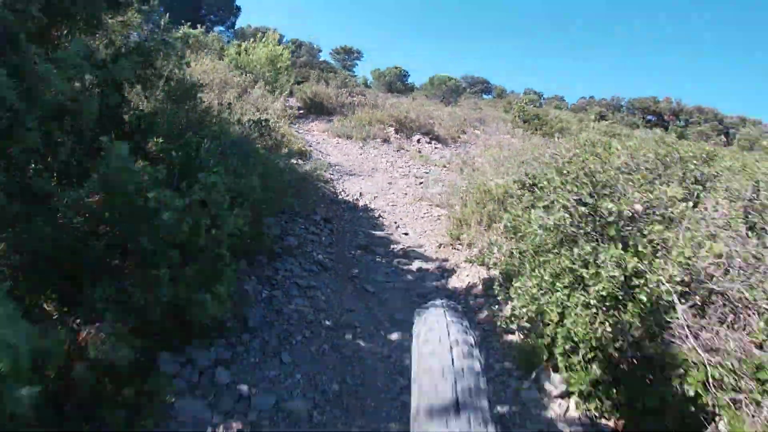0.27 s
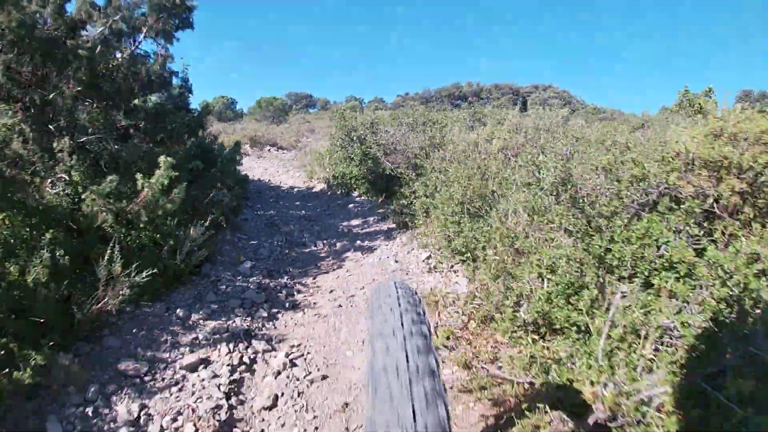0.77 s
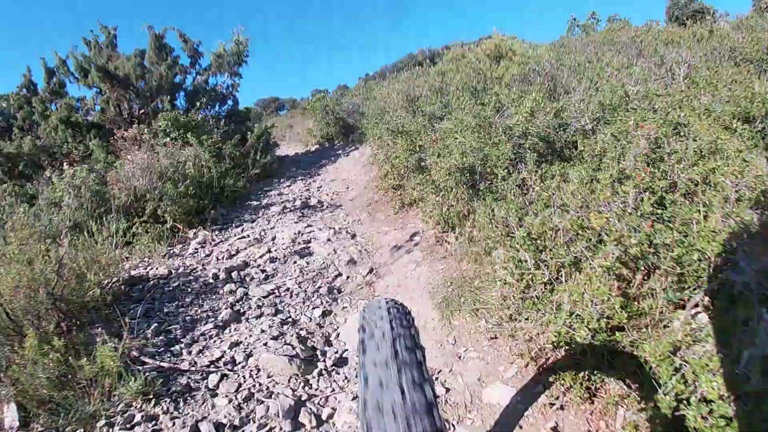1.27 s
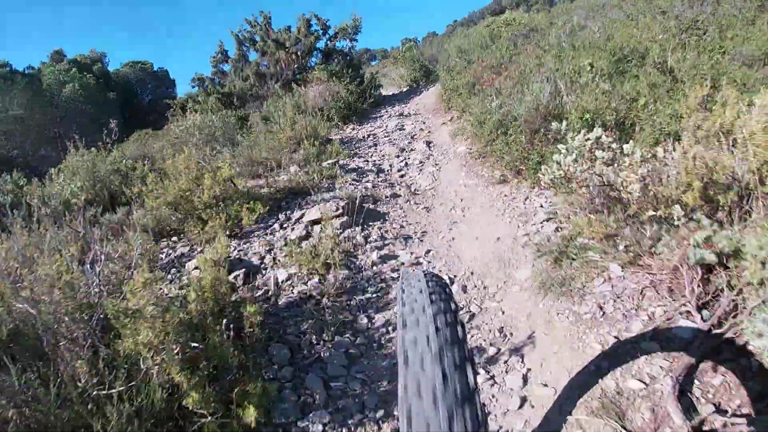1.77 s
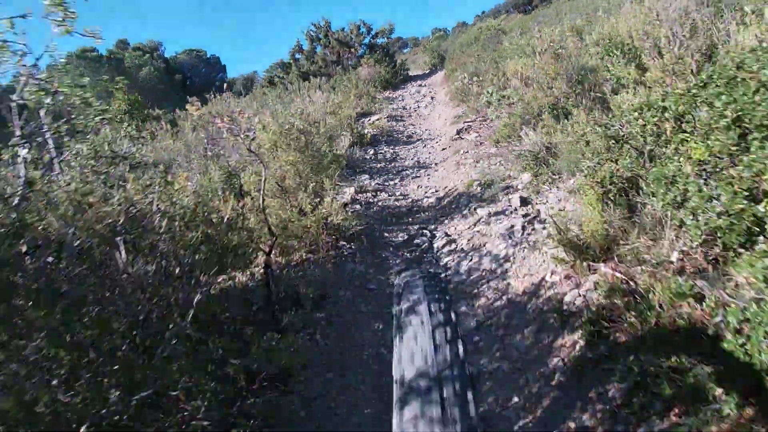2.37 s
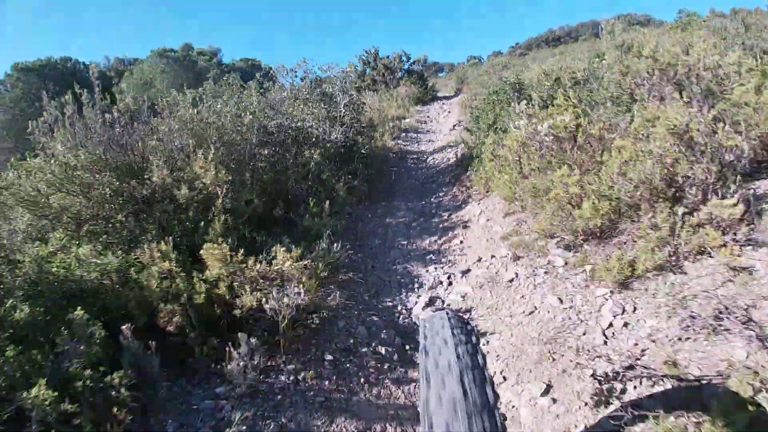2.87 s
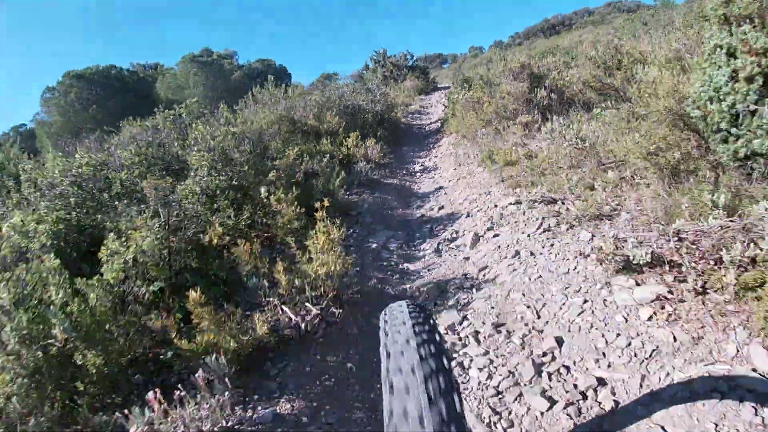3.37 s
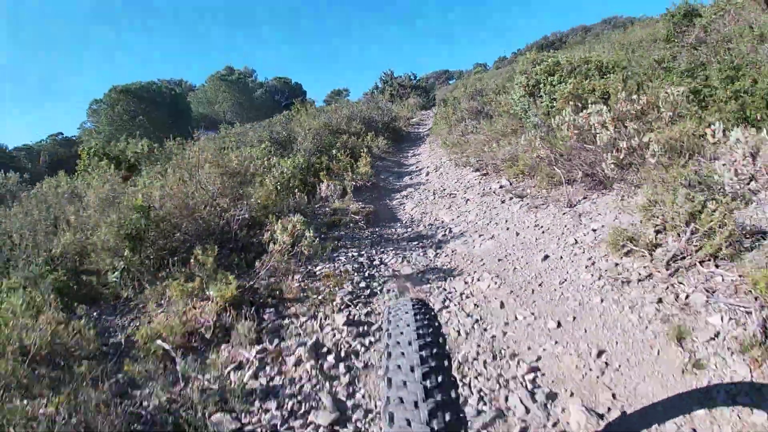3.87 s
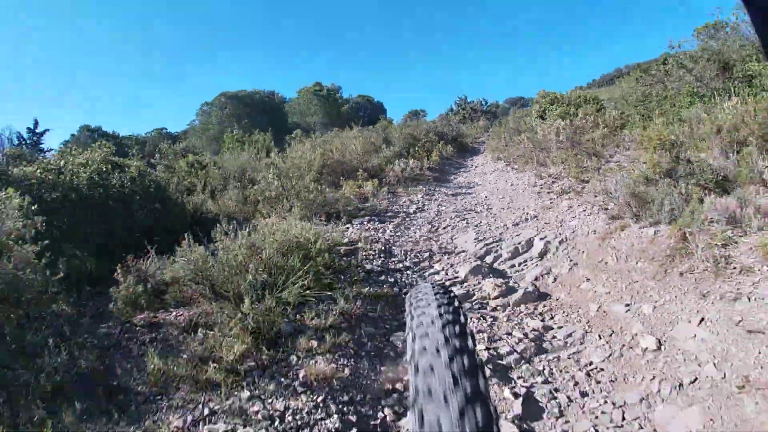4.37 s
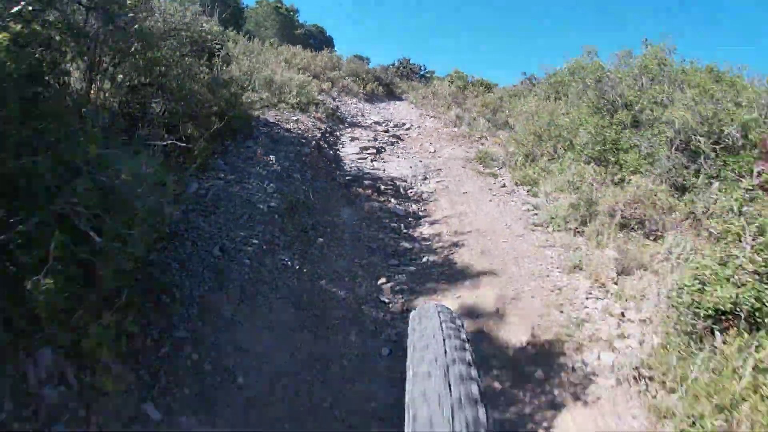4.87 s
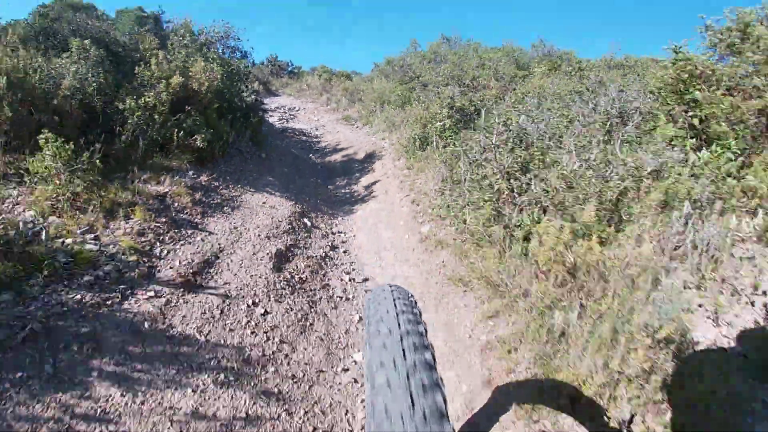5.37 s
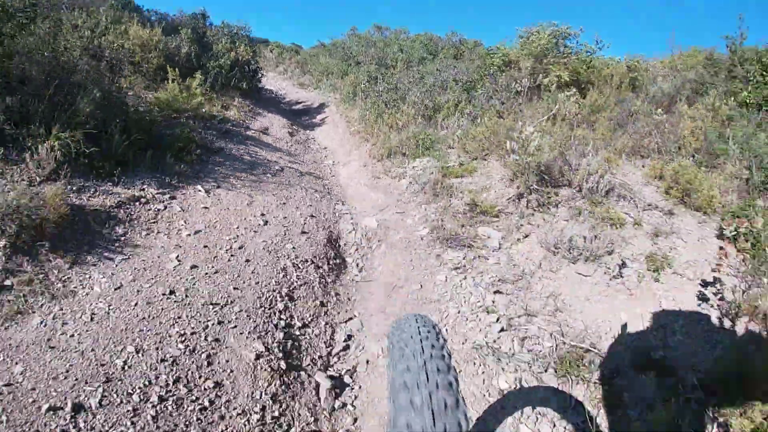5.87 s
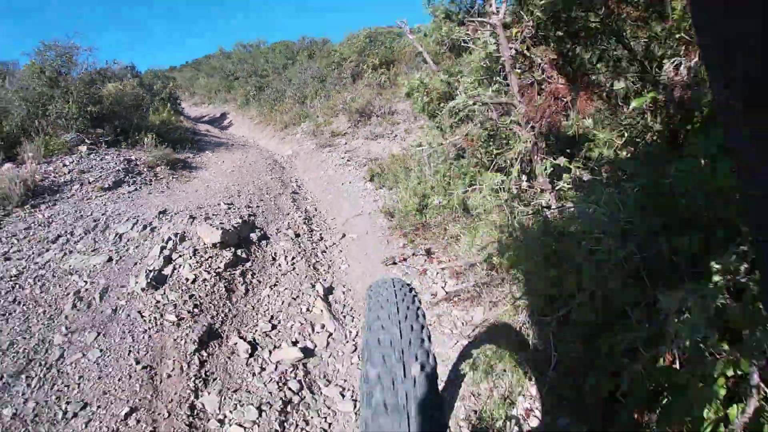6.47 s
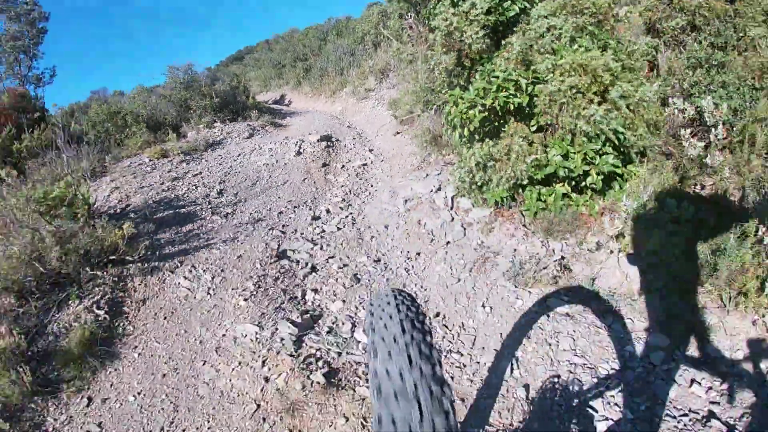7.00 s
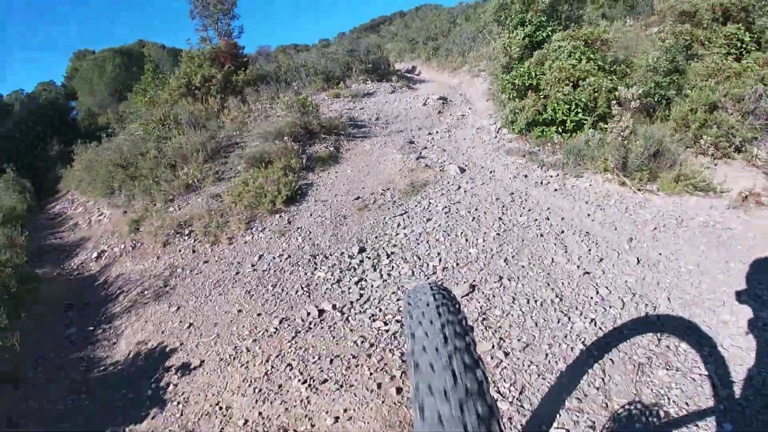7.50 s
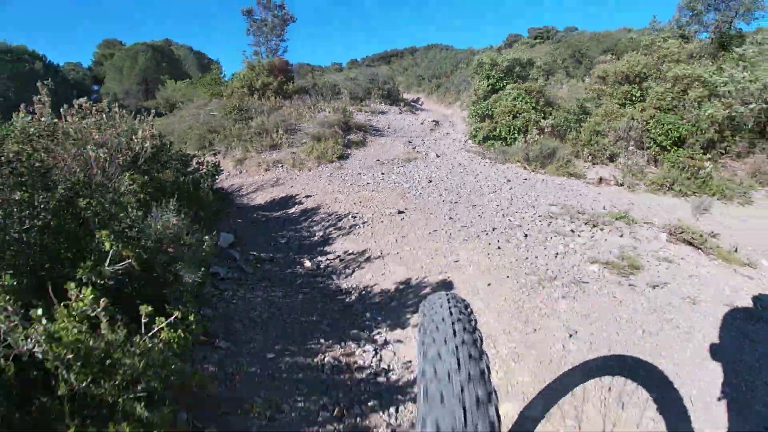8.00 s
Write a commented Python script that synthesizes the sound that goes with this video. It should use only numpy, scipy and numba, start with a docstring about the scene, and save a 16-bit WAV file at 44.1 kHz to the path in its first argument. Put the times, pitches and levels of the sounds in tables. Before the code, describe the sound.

On a rocky hillside trail, a mountain bike rolls over loose gravel. Low wind buffets and pops at a small enclosed microphone worn by the rider, while tyres crunch grit, the frame shakes, and plastic knocks and bright stone ticks come irregularly. The knocks are sparse at first, then frequent from just after one second. Treble is dulled, close and without echo.

```python
"""On a stony trail a mountain bike climbs, heard by a small camera in a closed housing on the rider.
Wind buffets the microphone port: band-passed noise whose centre moves with the stream, with sharp pops.
Random cracks crush gravel and excite the resonances of the frame; shaped noise bursts make the knocks of
the mount and the ticks of thrown stones; a narrow band of noise hums in the tyre.
The housing dulls the treble and a limiter holds the peaks."""
import sys
import numpy as np
from scipy import signal
from scipy.fft import rfft, irfft
from scipy.io import wavfile
from scipy.ndimage import uniform_filter1d, minimum_filter1d
from numba import njit

SR = 44100
rng = np.random.default_rng(int(sys.argv[2]) if len(sys.argv) > 2 else 0)


def digitize_waveform(pressure):
    """Quantize a signal to 16-bit integers and store it at the path in sys.argv[1].

    Rows of a 2-D input are taken as channels; values are limited to [-1, 1].
    """
    field = np.atleast_2d(pressure).T
    bounded = np.clip(field, -1, 1)
    quanta = np.round(bounded * 32767).astype(np.int16)
    wavfile.write(sys.argv[1], SR, quanta)


N = 363384

# pressure pops when an eddy breaks on the port: start_s, level_db
EDDY_POPS = [(0.436, -18.5), (0.777, -21), (0.806, -18), (1.216, -18), (1.483, -18.5), (1.5, -22),
             (1.792, -22.5), (1.861, -15.5), (2.454, -15.5), (2.479, -16), (2.519, -17.5), (2.875, -17.5),
             (3.272, -23), (3.291, -15.5), (3.336, -23), (3.458, -17), (3.895, -18), (3.92, -15.5),
             (3.932, -26.5), (4.558, -13), (4.574, -14.5), (4.597, -23.5), (5.322, -14), (5.346, -14.5),
             (5.796, -14.5), (5.812, -13.5), (7.994, -22)]
# broad transmission of air-borne sound through the housing: frequency_hz, gain_db
HOUSING_CURVE = [(600, 5.5), (1200, 4.5), (2500, -4), (4300, -12.5), (6200, -14), (7000, -29.5),
                 (8000, -47.5), (10000, -61.5), (12000, -69), (15000, -75.5)]
# cavity resonances of the housing: centre_hz, width_hz, lift_db
CAVITY_MODES = [(1725, 89, 6.7), (5370, 530, 8.7), (9400, 300, 6), (10500, 260, 11)]
STRIKE = 0.3  # first contact of a knock or tick, relative to the rattle that follows


def undb(db):
    """The decibel law for amplitude: 20 dB is a factor of ten."""
    return 10 ** (np.asarray(db) / 20)


def unit(x):
    """Normalisation by effective value: scale to rms 1."""
    return x / np.sqrt(np.mean(x ** 2))


def columns(table):
    """Linear interpolation: every column after the time, at every sample."""
    s, *rest = np.transpose(table)
    return [np.interp(np.arange(N) / SR, s, c) for c in rest]


@njit
def svf(x, hz, width):
    """A driven, damped resonator: band-pass whose centre may move, with gain 1 at the centre."""
    y, b, l = np.empty(len(x)), 0., 0.  # b and l: states of the two integrators
    for i in range(len(x)):
        g, k = np.tan(np.pi * hz[i] / SR), width / hz[i]
        v = (b + g * (x[i] - l)) / (1 + g * (g + k))
        b, l, y[i] = 2 * v - b, l + 2 * g * v, k * v
    return y


def band(x, hz, width):
    """A resonator of constant pitch: fixed band-pass."""
    return svf(x, np.full(len(x), 1. * hz), 1. * width)


def butterworth(x, order, edge_hz, kind="low"):
    """Maximally flat filtering: the pass band has no ripple."""
    return signal.sosfilt(signal.butter(order, edge_hz, kind, fs=SR, output="sos"), x)


def colour(x, points, peaks=()):
    """Minimum phase: a folded cepstrum makes a causal filter from a gain curve and its resonances."""
    size = 4096
    f = np.maximum(np.fft.rfftfreq(size, 1 / SR), 1)
    hz, db = np.transpose(points)
    db = np.interp(np.log(f), np.log(hz), np.maximum(db, -90))
    for centre_hz, width_hz, lift_db in peaks:
        db = db + lift_db / (1 + (2 * (f - centre_hz) / width_hz) ** 2)
    cepstrum = irfft(np.log(undb(db)))
    cepstrum[1:size // 2] *= 2
    cepstrum[size // 2 + 1:] = 0
    response = irfft(np.exp(rfft(cepstrum)))
    return signal.fftconvolve(x, response)[:len(x)]


def walk(rate):
    """Slow random modulation: levels held 1 / rate s, smoothed twice, with rms 1."""
    hold = int(SR / rate)
    steps = np.repeat(rng.standard_normal(N // hold + 1), hold)
    return unit(uniform_filter1d(uniform_filter1d(steps, hold), hold)[:N])


def grains(rate, spread_db, top_db, smear_s):
    """Shot noise: random cracks of unequal, capped size, each a short decaying burst of noise."""
    size_db = np.minimum(spread_db * rng.exponential(size=N), top_db)
    hits = (rng.random(N) < rate / SR) * undb(size_db)
    softened = uniform_filter1d(hits ** 2, size=int(smear_s * SR / 2))
    power = signal.lfilter([1], [1, -np.exp(-1 / (smear_s * SR))], softened)
    return unit(np.sqrt(np.abs(power)) * rng.standard_normal(N))


def bursts(rows, shape, rise_s, fall, strike=0.):
    """Impact excitation: each (start_s, level_db, length_s, ..) row is a noise burst through a filter."""
    size = 8192
    out = np.zeros(N + size)
    t = np.arange(size) / SR
    for (s, level_db, length_s, *rest), noise in zip(rows, rng.standard_normal((len(rows), size))):
        swell = (1 - np.exp(-t / rise_s)) * np.exp(-(t / max(length_s, 1e-4)) ** fall)
        energy = np.sum(swell ** 2)
        contact = strike * np.sqrt(energy) * (t == 0)
        one = shape(noise * swell + contact, *rest)
        # the burst gets the energy of a tone with this envelope
        match = np.sqrt(energy / np.sum(one ** 2) / 2)
        out[int(s * SR):int(s * SR) + size] += undb(level_db) * one * match
    return out[:N]


def throat(x):
    """Cavity resonance: the port lifts a band of air-borne sound, moving as the housing tilts."""
    # resonance of the port: start_s, centre_hz
    throat_path = [(0, 3510), (3.85, 3500), (4.15, 2960), (4.6, 3000), (5.0, 3460), (8.24, 3430)]
    width_hz, lift_db = 330., 7.5
    return x + undb(lift_db) * svf(x, columns(throat_path)[0], width_hz)


def wind():
    """Turbulence: eddies throb in the port over a deep rumble, and smaller ones flutter above the throb."""
    # air stream over the port: start_s, throb_level_db, throb_centre_hz, rumble_level_db
    stream = [(0, -27, 91, -21), (.3, -22, 85, -18.5), (.58, -16.5, 86.4, -32.5), (.8, -18, 66.6, -17),
              (1.05, -20.5, 108.8, -24), (1.35, -22.5, 72.3, -21), (1.7, -22, 79.4, -19),
              (1.9, -17.5, 109.3, -20.5), (2.12, -18.5, 113, -29), (2.33, -28, 72, -18.5),
              (2.58, -16, 113, -30), (2.85, -19.5, 90.4, -21.5), (3.28, -19.5, 105.3, -20.5),
              (3.5, -15, 80, -24.5), (3.9, -19.5, 81.8, -22), (4.2, -22, 91.8, -26.5),
              (4.75, -23, 82.4, -23), (5.25, -16.5, 82.4, -23.5), (5.6, -21, 78.8, -19),
              (6.1, -28.5, 72, -28), (6.7, -42, 62.5, -20), (7.15, -17, 61.9, -18.5), (7.6, -20, 67, -22),
              (8.24, -25.5, 63.7, -19.5)]
    throb_db, hz, rumble_db = columns(stream)

    # a breaking eddy lifts the throb around its pop
    surge_db, surge_s = -3.5, 0.025  # level over the pop, time scale of the bell
    s, pop_db = np.transpose(EDDY_POPS)
    pops = np.bincount((s * SR).astype(int), undb(2 * (pop_db + surge_db)), N)
    bell = np.exp(-(np.arange(-SR // 4, SR // 4) / SR / surge_s) ** 2)
    surge_power = np.abs(signal.fftconvolve(pops, bell, "same"))
    power = undb(2 * throb_db) + surge_power
    surge_share = surge_power / power

    # surges and small gusts move the centre by these shares
    surge_rise, wander = 0.4, 0.045
    gusts = walk(5)
    hz = hz * (1 + surge_rise * surge_share) * np.exp(wander * gusts)
    throb = svf(svf(svf(rng.standard_normal(N), hz, 41.8), hz, 81.0), hz, 120.0)
    throb = unit(throb * undb(0.74 * walk(8) + 1.8 * gusts))

    rumble = band(band(rng.standard_normal(N), 36, 47), 42, 45)
    rumble = unit(rumble * undb(1.34 * walk(6.0)))

    flutter = unit(svf(svf(grains(150, 6.1, 19.5, 0.0049), 2.456 * hz, 67.0), 1.63 * hz, 240.0))
    flutter = undb(-19.5 + 2.5 * gusts + 9.5 * surge_share) * flutter

    # quicker eddies just above the throb, stronger as the stream speeds up
    at_100_hz_db, db_per_octave = -12.5, 7
    quick = unit(svf(svf(rng.standard_normal(N), 1.376 * hz, 60.0), 1.393 * hz, 60.0))
    quick = undb(at_100_hz_db + db_per_octave * np.log2(hz / 100)) * quick
    return np.sqrt(power) * (throb + quick + flutter) + undb(rumble_db) * rumble + slaps()


def slaps():
    """Pressure transients: each pop is one quick swing that thumps and shakes the port for a moment."""
    swing_db, shake_db, thump_db = 6.5, -8, -4.5  # over the level of the pop
    out = np.zeros(N)
    for (s, level_db), (quick, turn) in zip(EDDY_POPS, rng.random((len(EDDY_POPS), 2))):
        hz = 190 * (1 + 0.66 * quick)
        cycles = np.arange(int(2 * SR / hz)) * hz / SR - 1
        swing = np.exp(-np.abs(cycles / 0.26) ** 2.0) * np.cos(2 * np.pi * (cycles + turn))
        out[int(s * SR):int(s * SR) + len(cycles)] += undb(level_db + swing_db) * swing
    thumps = [(s, db + thump_db, .014) for s, db in EDDY_POPS]
    shakes = [(s, db + shake_db, .012) for s, db in EDDY_POPS]
    out += bursts(thumps, lambda x: band(band(x, 230, 120), 200, 260), rise_s=0.0018, fall=0.81)
    return out + bursts(shakes, lambda x: band(band(x, 550, 890), 700, 1100), rise_s=0.0041, fall=1.0)


def ground():
    """Superposition: frame shake, pebbles and gravel add up, swelling with one load on the tyre."""
    # ground under the tyres: start_s, coarse_stones_db, fine_gravel_db
    surface = [(0.0, -34.5, -33), (0.96, -43.5, -42), (1.4, -35.5, -35), (1.97, -38, -39.5),
               (2.8, -36.5, -36), (3.28, -38, -35.5), (3.63, -40, -37), (4.18, -33.5, -34),
               (4.5, -36.5, -38), (4.75, -33, -31.5), (5.05, -42.5, -38.5), (5.65, -38.5, -35),
               (6.35, -40.5, -37), (6.72, -34, -34.5), (7.32, -34.5, -35.5), (7.44, -32.5, -35.5),
               (7.6, -40.5, -42.5), (7.87, -45.5, -42.5), (8.24, -42, -35)]
    coarse_db, fine_db = columns(surface)
    load = np.tanh(3.8 * walk(15) + 0.66 * walk(6.8))
    pebble_db = -9.5  # relative to the frame shake
    coarse = frame_shake(load) + undb(pebble_db) * pebbles(load)
    return undb(coarse_db) * coarse + undb(fine_db) * gravel(load)


def frame_shake(load):
    """Modal excitation: jolts from stones ring the modes of frame and tyre."""
    # frame and tyre modes: centre_hz, width_hz, level_db
    frame_modes = [(464, 35, 6), (600, 46, 6.5), (729, 21.2, 7), (855.3, 19.6, 9), (1230, 67, -3)]
    drift = 0.024  # typical share by which each mode wanders
    jolts = grains(500, 5.6, 14.8, 0.0018) * undb(1.86 * load)
    shake = undb(-17.0) * band(jolts, 650, 370)
    for k, (hz, width_hz, db) in enumerate(frame_modes):
        mode = svf(jolts, hz * np.exp(drift * walk(4)), 1. * width_hz)
        shake = shake + (-1) ** k * undb(db) * mode  # neighbours in opposite phase
    return unit(shake)


def pebbles(load):
    """Resonant fracture noise: short snaps and longer grinds ring at a pitch that changes at random."""
    draws = np.repeat(rng.standard_normal(N // 512 + 1), 512)[:N]  # a new pitch every 12 ms
    pitch_hz = 1800 * undb(4.0 * draws.clip(-2, 1.3))
    snaps = grains(59, 2.0, 21, 0.0017)
    grinds = undb(12.5) * grains(32, 17.0, 8.1, 0.0061)
    cracks = (snaps + grinds) * undb(3.6 * load)
    ringing = svf(svf(cracks, pitch_hz, 620.0), pitch_hz, 1200.0)
    return unit(butterworth(ringing, 6, 5000))  # dulled by the housing wall


def gravel(load):
    """Granular friction: fine grit crackles in patches over a smooth roll, through the housing."""
    # borders between coarse, middle and fine grit: edge_hz
    grit_edges_hz = [2000, 4430]
    ranges = [(grit_edges_hz[0], "low"), (grit_edges_hz, "band"), (grit_edges_hz[1], "high")]
    # each size cracks on its own in its own range, over cracks that span them all
    sized = 0
    for edge_hz, kind in ranges:
        sized = sized + undb(2.67 * walk(25)) * butterworth(grains(110, 5.95, 13.6, 0.0024), 2, edge_hz, kind)
    crunch = undb(1.77 * load) * (sized + undb(-3.0) * grains(120, 3.5, 11.6, 0.0015))
    roll = butterworth(rng.standard_normal(N), 6, 6800)
    return unit(throat(colour(crunch + undb(-3.5) * roll, HOUSING_CURVE, CAVITY_MODES)))


def knocks():
    """Structure-borne impact: gritty blows excite the mount's modes, and the plastic dulls the treble."""
    # knocks and rattles of the mount: start_s, level_db, pitch_hz, length_ms
    blow_table = [(0.416, -33, 2620, 3.3), (0.609, -26, 2200, 3), (0.712, -20.5, 2190, 2.1),
                  (0.49, -23, 1860, 6.8), (0.8052, -18.5, 1220, 3.3), (1.0123, -21, 1480, 5.4),
                  (1.042, -29, 2100, 25), (1.2173, -9, 1570, 4.7), (1.217, -16.5, 2960, 5.8),
                  (1.243, -26.5, 2300, 36), (1.286, -17.5, 1550, 2.8), (1.343, -20.5, 1900, 14),
                  (1.468, -17.5, 1730, 9.2), (1.4935, -9, 1700, 3.2), (1.524, -9.5, 1960, 1.8),
                  (1.777, -19.5, 1800, 10), (2.105, -13, 1740, 5.1), (2.267, -22, 1810, 8.7),
                  (2.293, -19, 3040, 1.3), (2.3836, -16, 1810, 2.4), (2.501, -15.5, 1750, 3),
                  (2.874, -25, 1510, 23), (3.053, -26, 1740, 7.7), (3.214, -19.5, 1500, 7.7),
                  (3.314, -21, 1710, 19), (3.4086, -9.5, 1870, 2.8), (3.448, -21.5, 1700, 8.6),
                  (3.663, -15, 1330, 6.8), (3.664, -15.5, 2550, 4.2), (3.71, -15.5, 1750, 6.7),
                  (3.745, -22.5, 2160, 6.5), (3.779, -20, 1320, 5.1), (3.9879, -23.5, 2060, 42),
                  (3.9906, -18, 2920, 3.6), (4.002, -19, 1020, 4.7), (4.011, -14.5, 2150, 17),
                  (4.028, -20.5, 800, 38), (4.035, -21, 1720, 29), (4.056, -22, 1370, 3.8),
                  (4.281, -22.5, 1790, 35), (4.32, -20.5, 2180, 14), (4.388, -8, 2230, 2.2),
                  (4.558, -21, 900, 5.2), (4.664, -25.5, 1850, 41), (4.784, -21, 1480, 2.8),
                  (4.83, -5, 1820, 1.2), (4.863, -24, 1890, 12), (4.983, -14, 1790, 2.4),
                  (5.347, -16.5, 910, 2.7), (5.529, -23.5, 2900, 9.8), (5.5328, -10, 1370, 2.8),
                  (5.57, -21, 3500, 2.8), (5.7239, -15.5, 1510, 16.5), (5.725, -18, 3050, 12),
                  (5.812, -23, 1100, 6.2), (6.33, -22, 1610, 3.8), (6.533, -27, 1790, 31),
                  (6.591, -13, 1600, 3.4), (6.773, -8, 1560, 1.25), (6.803, -25.5, 1420, 18),
                  (6.925, -21.5, 1490, 7), (7.085, -24, 840, 30), (7.148, -20.5, 870, 10),
                  (7.29, -22.5, 890, 29), (7.5512, -4, 1680, 0.27), (8.01, -28, 1800, 4.6),
                  (8.041, -17.5, 2100, 3.5), (8.15, -12, 1650, 3.9), (8.156, -12.5, 1630, 2.6),
                  (8.21, -14.5, 1950, 4.4)]
    # modes of the plastic mount: centre_hz, width_hz, lift_db
    mount_modes = [(870, 400, 14), (1642, 46, 4.5), (1870, 350, 5.5), (3000, 520, 6)]
    # transmission of the plastic: frequency_hz, gain_db
    plastic = [(300, -35.0), (700, 4.5), (3400, 1.0), (4400, -2.5), (7000, -39.0), (12000, -81.0)]

    def body(x, hz, width_hz):
        """Each blow favours a range around its pitch before the mount colours it."""
        contacts = np.repeat(undb(2.2 * rng.standard_normal(len(x) // 64)), 64)  # 1.5 ms apart
        favoured = band(band(x * contacts, hz, 0.98 * width_hz), hz, 2.8 * width_hz)
        return colour(favoured, plastic, mount_modes)

    # a long rattle stirs more modes than a short knock
    spread_at_10_ms_hz, spread_power = 940, 0.7
    rows, tails = [], []
    for s, db, hz, ms in blow_table:
        rows.append((s, db, ms / 1e3, hz, spread_at_10_ms_hz * (ms / 10) ** spread_power))
        tails.append((s, db - 14.5, ms / 1e3 + 0.0094, hz, 2000))
    blows = bursts(rows, body, rise_s=0.00097, fall=1.64, strike=STRIKE)
    return blows + bursts(tails, body, rise_s=0.002, fall=0.61)


def ticks():
    """Brief contact, broad spectrum: stone on stone or metal clicks brightly, with a thin glint on top."""
    # sharp stone ticks: start_s, level_db
    tick_table = [(0.0565, -22.5), (0.11, -24.5), (0.169, -25.5), (0.2758, -29.5), (0.417, -38.5),
                  (0.485, -19.5), (0.518, -28), (0.5655, -37), (1.048, -22.5), (1.076, -27.5),
                  (1.1562, -23.5), (1.2171, -27.5), (1.3099, -27), (1.4663, -24), (1.708, -32),
                  (1.778, -23), (1.8073, -30), (1.8375, -17), (1.963, -26), (2.27, -36), (2.2924, -18.5),
                  (2.6534, -25.5), (2.7187, -27), (2.7545, -25), (2.8, -28), (2.827, -27.5),
                  (2.9357, -20.5), (2.9814, -19), (3.054, -19), (3.2246, -24), (3.2737, -22.5),
                  (3.4062, -23.5), (3.5163, -26), (3.5387, -29), (3.6343, -34), (3.664, -38), (3.8242, -27),
                  (3.991, -24), (4.0137, -21.5), (4.2822, -38), (4.39, -26), (4.5391, -22), (4.6678, -24),
                  (4.742, -35), (4.8035, -33), (4.8606, -33), (5.529, -25), (5.5704, -19), (5.7303, -29),
                  (6.1444, -34), (6.54, -31), (6.7605, -21), (6.9321, -25), (6.999, -22.5), (7.0632, -20),
                  (7.117, -21.5), (7.1512, -33), (7.342, -15), (7.4075, -28), (7.5517, -33),
                  (7.5622, -20.5), (7.9506, -24.5), (8.1329, -31), (8.1868, -23)]
    glint_db = -23.5  # relative to the click

    def bright(x):
        """Differentiation tilts the noise to the treble before the housing."""
        return colour(np.diff(x, prepend=0), HOUSING_CURVE, CAVITY_MODES + [(5400, 2800, 0.43)])

    def glint(x):
        """Cascaded resonators keep only the thin top."""
        return band(band(band(band(x, 9140, 3000), 9150, 3500), 10360, 4000), 7400, 4500)

    clicks = bursts([(s, db, .003) for s, db in tick_table], bright, rise_s=0.0004, fall=0.62, strike=STRIKE)
    glints = bursts([(s, db + glint_db, .002) for s, db in tick_table], glint, rise_s=0.001, fall=0.81)
    return throat(clicks) + glints


def tyre_hum():
    """Air-column resonance: the air in the tyre rings on the coarse stretch, shaken by the stones."""
    level_db, from_s, to_s, fade_db_per_s = -38, 6.85, 7.5, 74
    t = np.arange(N) / SR
    outside_s = np.maximum(0, np.maximum(from_s - t, t - to_s))
    hum = unit(band(band(rng.standard_normal(N), 253.5, 28), 268, 40))
    return undb(level_db - fade_db_per_s * outside_s) * hum


def scene():
    """Linear superposition: all sources add at one microphone."""
    return (wind() + ground() + knocks() + ticks() + tyre_hum())[None]


def record(dry):
    """Band limiting and gain control: the housing dulls the top, a look-ahead limiter holds the peaks."""
    dry = butterworth(dry, 6, 11300)
    ceiling, size, top_hz = .56, 441, 15200  # amplitude, window in samples, upper band edge
    gain = np.minimum(1, ceiling / (np.abs(dry) + 1e-9))
    gain = uniform_filter1d(minimum_filter1d(gain, size), size // 2)
    gain = uniform_filter1d(gain, size // 2)
    return signal.sosfilt(signal.ellip(8, .2, 70, top_hz, fs=SR, output="sos"), gain * dry)


dry = scene()
out = record(dry)
digitize_waveform(out)
```